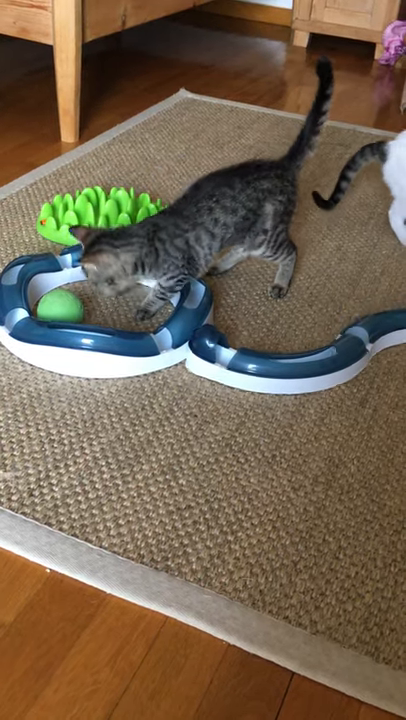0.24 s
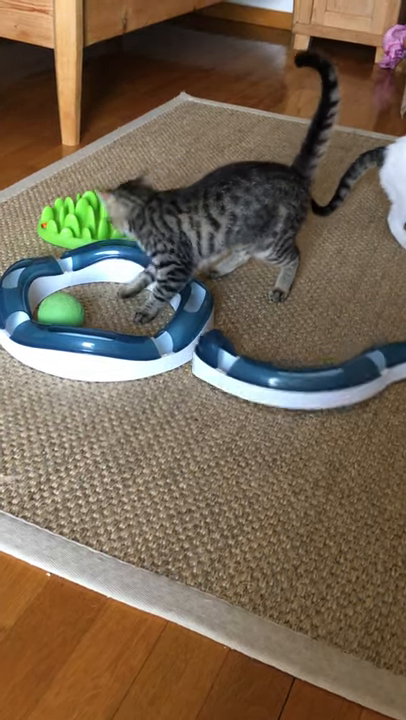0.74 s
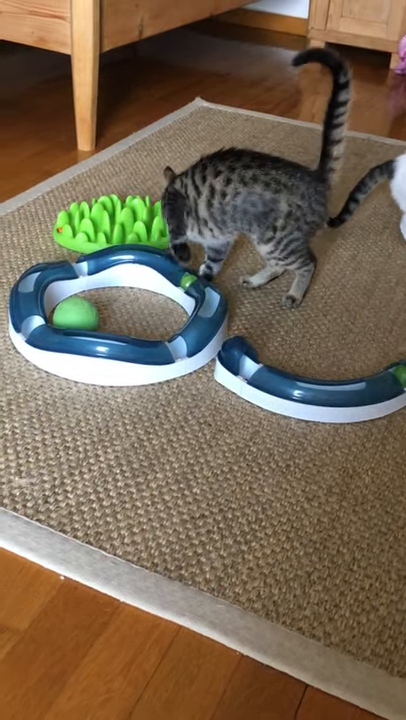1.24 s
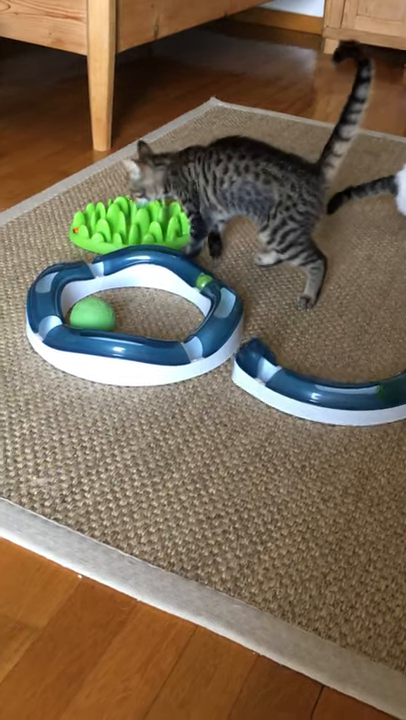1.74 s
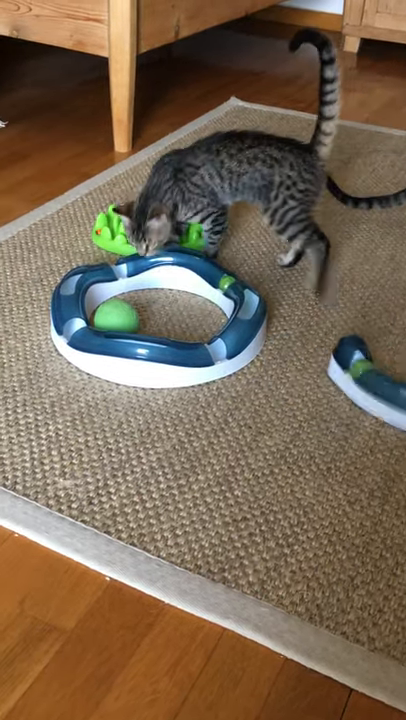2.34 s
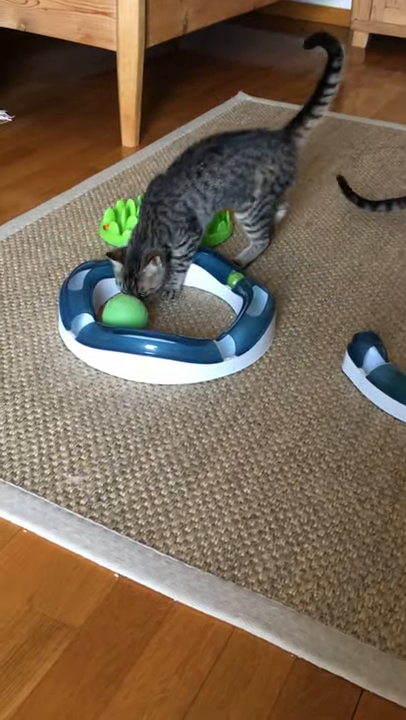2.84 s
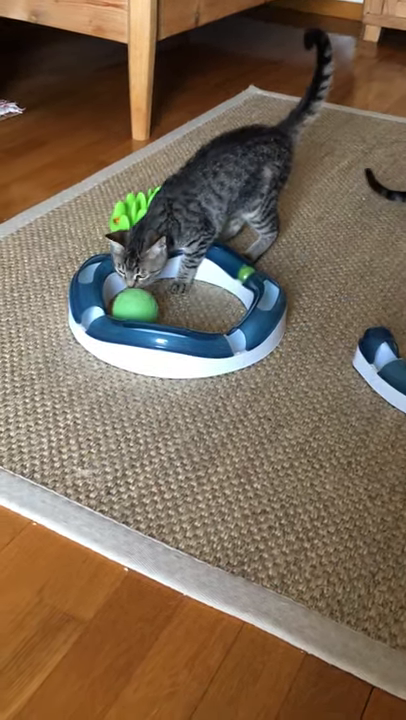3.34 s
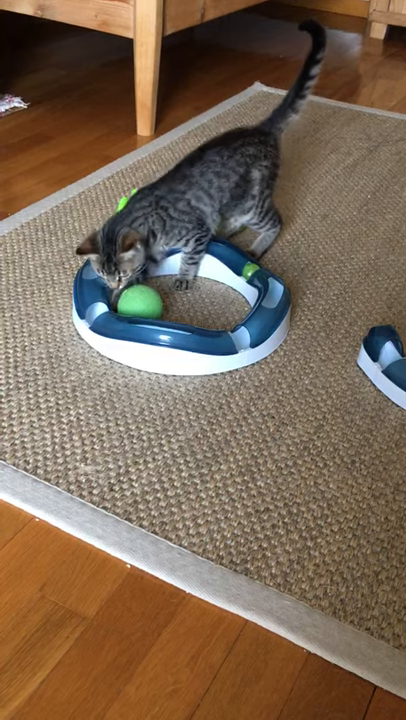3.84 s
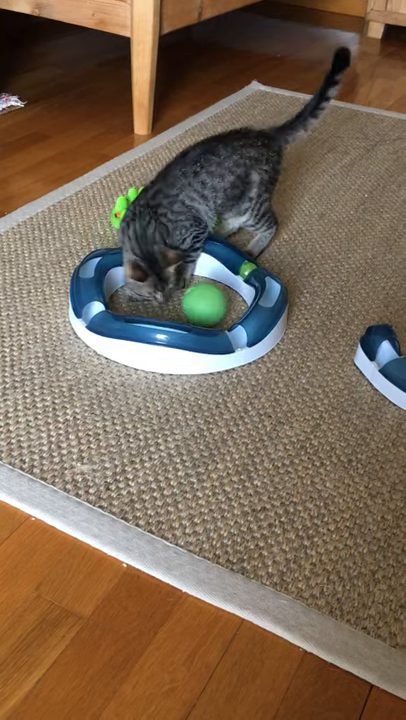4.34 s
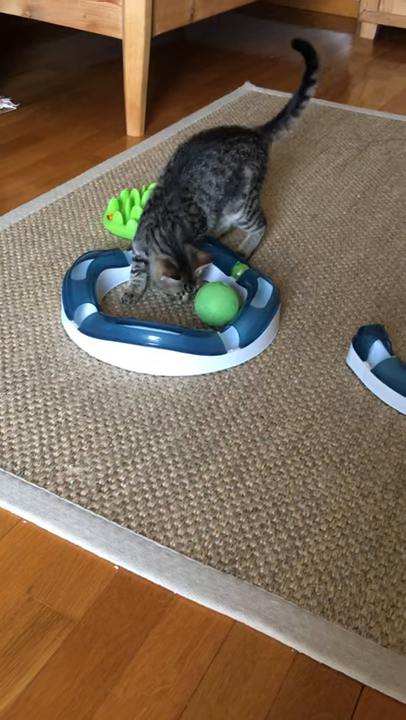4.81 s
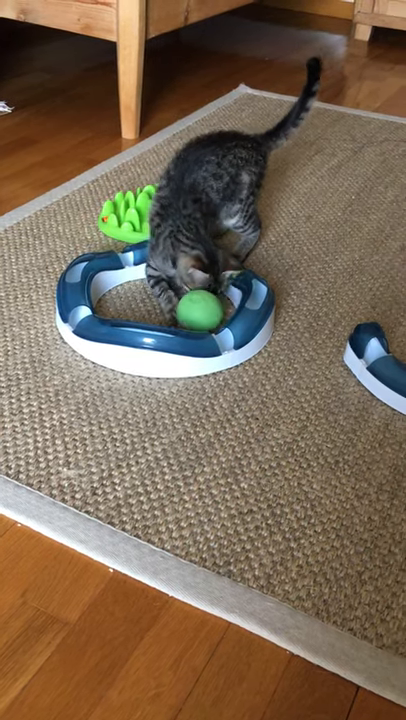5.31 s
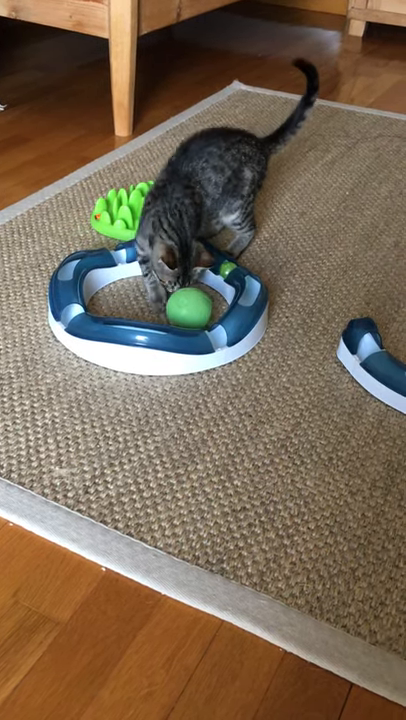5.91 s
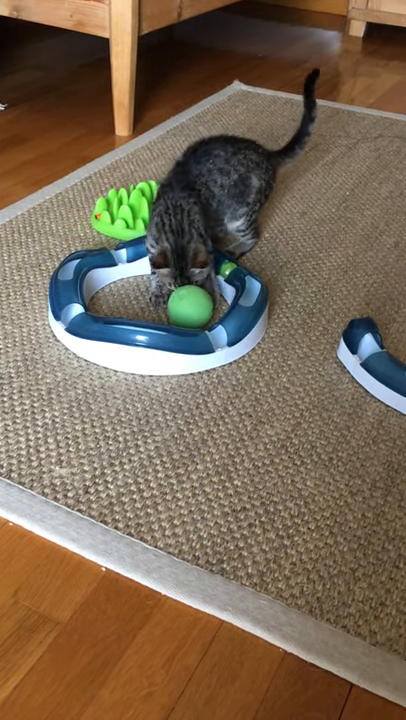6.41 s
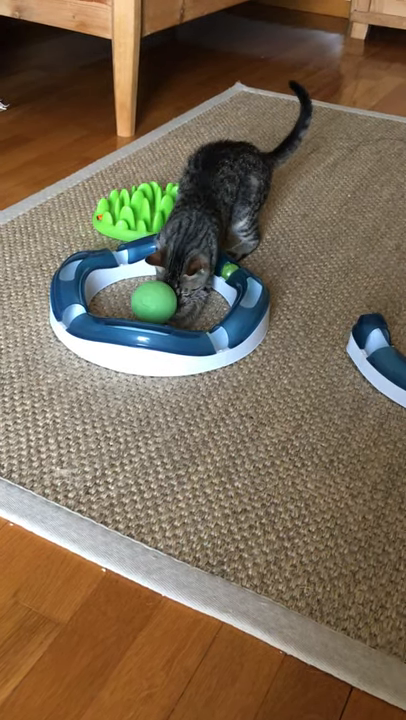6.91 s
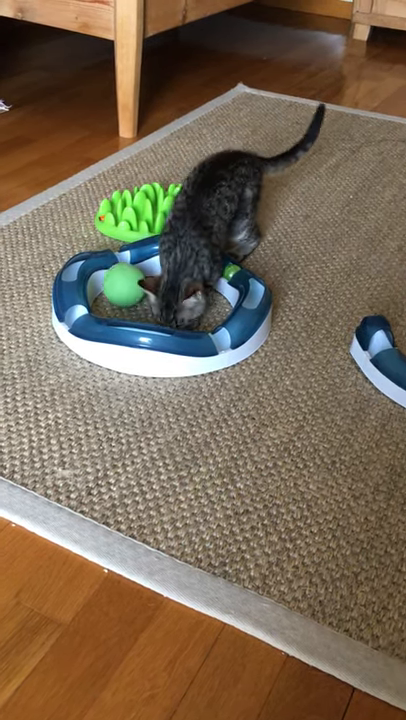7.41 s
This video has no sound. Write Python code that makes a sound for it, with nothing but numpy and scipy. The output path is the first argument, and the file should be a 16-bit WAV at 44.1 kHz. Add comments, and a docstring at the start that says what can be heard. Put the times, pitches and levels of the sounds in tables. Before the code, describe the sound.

Hollow plastic clatter and dry scraping on a rug in a bare room, peaking in a sharp double knock, then quietening into light ticks and rolling.

```python
"""A bare room with a wooden floor, where kittens bat at plastic ball tracks on a woven rug, heard on a phone.
Blows ring the hollow track shell as decaying modes, crack at the contact and thud into the floor, with low thumps.
Pieces dragged or rattling on hum and hiss as random ticks over the weave; a hollow ball rings over its ribs.
The room answers with a tail of up to half a second, shaped from noise bands, over a quiet noise hum."""
import sys
import numpy as np
from scipy import signal
from scipy.fft import rfft, irfft, next_fast_len
from scipy.io import wavfile
from scipy.ndimage import uniform_filter1d

SR = 44100
rng = np.random.default_rng(int(sys.argv[2]) if len(sys.argv) > 2 else 0)


def voltage_ratio(decibels):
    """Convert decibels (scalar or array-like) to amplitude ratios, 20 dB per decade."""
    exponent = np.asarray(decibels, float) / 20
    return 10 ** exponent


def log_audio(samples):
    """Write samples as a 16-bit WAV file to the path given in sys.argv[1]."""
    # one column per channel
    frames = np.atleast_2d(samples).T
    # limit to full scale, then quantise
    limited = np.clip(frames, -1, 1)
    pcm = np.round(limited * 32767).astype(np.int16)
    wavfile.write(sys.argv[1], SR, pcm)


N = 337785
T = np.arange(N) / SR

# blows on the track, thud and crack relative to the shell:
# (time [s], shell peak [dB], ringing centre [Hz], floor thud [dB], contact crack [dB])
KNOCKS = [(0.039, -37, 1570, -12.5, 0.5), (0.116, -31.5, 1670, -23.5, -1), (0.166, -40, 1580, -10.5, -19),
          (0.271, -41.5, 1370, -9.5, -22), (0.361, -37, 1720, -12.5, -6), (0.481, -39.5, 1310, -13, -2),
          (0.89, -13.5, 1120, -19, -8), (1.283, -43, 1780, -32, -0.5), (1.568, -46, 1430, -9, -1.5),
          (1.622, -26, 1060, -18, -16), (1.649, -21, 1300, -15, -11.5), (1.667, -39, 969, -6, -1),
          (1.696, -31.5, 3100, -10, 13), (1.71, -24, 1040, -37, -22), (1.745, -35, 1030, -13, 9),
          (1.795, -41, 1500, -10, 5), (1.834, -28.5, 1830, -25.5, 1), (1.889, -49, 1890, -15, -2),
          (1.944, -39.5, 1560, -12, -2), (2.001, -42, 1380, -14, 1), (2.102, -33, 1410, -12, 8),
          (2.17, -33.5, 1102, -24.5, 5.5), (2.192, -32.5, 1220, -38, -14), (2.301, -34.5, 1150, -4, -16),
          (2.43, -27, 1050, -9, -23), (2.442, -6.5, 1280, -12.5, -18), (2.45, -8.5, 1500, -16, 3.5),
          (2.457, -13.5, 1880, -12, -28), (2.588, -27.5, 1600, -12, 0), (2.747, -30.5, 1590, -18.5, -11),
          (3.129, -49.5, 1170, -20, -24.5), (3.317, -49.5, 1237, -10, -15.5), (3.617, -57, 2107, -13, -4),
          (3.651, -47, 1635, -11.5, -9.5), (3.99, -52, 1130, -14, -0.5), (4.511, -60.5, 1279, -12.5, -15.5),
          (4.584, -51, 1310, 2, -1), (4.778, -59.5, 1276, -6.5, -6), (4.908, -54, 1400, -16, -6),
          (5.033, -29.5, 2510, -37, 8.5), (5.202, -51.5, 1480, -2.5, 8.5), (5.451, -46, 2400, -27, 7),
          (5.463, -31.5, 2680, -26, 9.5), (5.488, -44.5, 1500, -14, 7), (5.527, -41.5, 2820, -16, 4),
          (5.556, -36.5, 1650, -36, 1), (5.607, -32, 3280, -19, 12.5), (5.629, -30, 1330, -12, 4),
          (5.698, -36, 1090, -7, -16), (5.761, -32.5, 1370, -27, 1), (5.77, -39, 1500, -19, 11),
          (5.788, -28.5, 1420, -8.5, -28), (5.81, -35, 1420, -10, -28), (6.068, -27.5, 1400, -13, 7.5),
          (6.08, -29, 1500, -11, -29), (6.209, -32.5, 1560, -8.5, -6), (6.288, -22.5, 1530, -25, -1),
          (6.304, -48, 1640, -10, -7), (6.349, -39, 1980, -14, 18.5), (6.467, -39.5, 1580, -13, 3),
          (6.634, -38, 1730, -5, 14), (6.759, -37, 2710, -17, -8), (6.776, -26.5, 1360, -20, 3),
          (6.834, -42.5, 1450, 4.5, -5.5), (7.054, -34, 1390, -3.5, -24), (7.125, -34, 1030, -6, -5.5),
          (7.272, -36, 1560, -41, 4), (7.306, -45, 1430, -3.5, 1), (7.353, -38.5, 1490, -15, 1),
          (7.388, -47, 1990, -27, 1), (7.613, -41.5, 1370, -6, -1)]
# low floor thumps: paws landing, track pieces settling, and the deep boom under the hardest blow:
# (time [s], peak [dB], centre [Hz])
FLOOR_THUMPS = [(0.63, -46, 198), (0.702, -51.5, 102), (1.661, -35, 325), (1.724, -43.5, 220),
                (2.301, -37, 339), (2.444, -24, 320), (2.452, -28, 135), (2.508, -29.5, 315),
                (3.869, -58, 364), (5.198, -49.5, 407), (5.294, -48, 61.9), (5.972, -40, 260),
                (6.013, -50, 280), (6.128, -47, 191), (6.858, -56, 415), (7.618, -42.5, 198)]
# modes of the hollow track shell: (frequency [Hz], relative level [dB], t60 [s])
SHELL_MODES = [(1003, 4, 0.0072), (1191, 7, 0.014), (1310, 1.5, 0.022), (1500, 5.5, 0.017),
               (1670, 5.5, 0.015), (1927, 3.5, 0.018), (2212, 0.5, 0.015), (2479, 3.5, 0.012),
               (2773, -7.5, 0.022), (2899, -14.5, 0.04), (3633, -12.5, 0.019), (4364, -15.5, 0.012),
               (5250, -10, .015), (5666, -1, 0.019)]
# modes of floor and rug under the toy: (frequency [Hz], relative level [dB], t60 [s])
BOARD_MODES = [(82, -21, .12), (116, -8, 0.16), (187, -2, .08), (245.4, 7.5, 0.03), (345, -1, 0.057),
               (468.4, 2.5, 0.023), (586, -2, 0.045), (712, 7, 0.02)]
# treble colour of the sharpest contact crack: (frequency [Hz], relative level [dB])
CRACK_COLOUR = [(1180, -38), (2000, -12), (2670, -7.5), (3280, -8), (6420, -14), (9580, -17.5),
                (10300, -17.5), (16000, -33)]
# pieces and paws dragged over the weave, or rattling on after a knock, one row a stroke:
# (start [s], length [s], shell rumble gain [dB], rumble centre [Hz], fibre hiss gain [dB])
RUB_STROKES = [(-0.04, 0.4, -55, 1540, -79), (0.39, 0.21, -58.5, 1450, -68),
               (0.615, 0.38, -53.5, 1430, -79), (0.844, 0.2, -49.5, 1220, -77),
               (1.72, 0.077, -47, 1270, -75), (1.824, 0.33, -52, 1589, -82), (2.118, 0.2, -47.5, 1260, -88),
               (2.359, 0.082, -51, 1220, -58), (2.604, 0.14, -53.5, 1500, -76),
               (2.719, 0.12, -71, 1585, -63.5), (2.891, 0.23, -70.5, 1330, -94.5),
               (3.413, 0.14, -70, 1280, -96), (5.104, 0.14, -57, 1970, -75), (5.24, 0.29, -61, 1000, -99),
               (5.563, 0.15, -48, 1880, -81), (5.741, 0.08, -55.5, 1510, -77),
               (6.154, 0.44, -59, 1540, -71), (6.467, 0.15, -36.5, 2900, -68),
               (6.589, 0.24, -44.5, 2630, -54), (6.8, 0.21, -53.5, 1570, -90),
               (6.953, 0.64, -65.5, 1430, -103)]
# faint shuffling between strokes: (rumble gain [dB], rumble centre [Hz], hiss gain [dB])
SHUFFLE = (-71, 1000, -84)
# colour of the loose fibres' hiss: (frequency [Hz], relative level [dB])
FIBRE_COLOUR = [(1760, -17.5), (3000, -7), (3170, -18.5), (3550, -21), (4470, -16.5), (8950, -17),
                (16000, -28.5)]
# hollow ball rolling over the weave, one row a roll: (start [s], length [s], gain [dB], centre [Hz])
ROLLS = [(-0.03, 0.088, -65, 450), (0.26, 0.12, -77, 350), (0.45, 0.22, -70, 328), (0.83, 0.078, -62, 350),
         (2.08, 0.13, -54, 600), (2.25, 0.19, -56, 345), (3.81, 0.055, -65, 468), (4.16, 0.14, -61, 530),
         (4.28, 0.18, -54, 510), (4.57, 0.21, -52.5, 460), (5.3, 0.19, -54, 740), (5.46, 0.11, -63, 550),
         (5.6, 0.2, -58, 400), (6.05, 0.042, -43, 530), (6.18, 0.18, -55, 500), (6.6, 0.5, -60, 470),
         (7.05, 0.035, -49.5, 470), (7.12, 0.079, -62, 470), (7.3, 0.19, -65, 450),
         (7.5, 0.034, -57.5, 530), (7.56, 0.1, -56, 500)]
# resonances of the ball, each passed twice: (frequency [Hz], width of one pass [Hz], relative level [dB])
BALL_MODES = [(286, 140, -7.5), (350, 46, 2), (404, 77, 4.5), (504, 94, 1), (550.4, 78, 5), (654, 12, -6.5),
              (714, 130, -10), (950, 76, -21)]
# colour of the house hum: (frequency [Hz], relative level [dB])
HUM_COLOUR = [(18, -37), (30, -2), (64, 5), (98, 5.5), (204, -5.5), (336, -3.5), (437, -11), (666, -9.5),
              (937, -13), (1500, -22), (3400, -31), (12300, -33), (16000, -45.5)]
# bands of the room tail: (centre [Hz], t60 [s], relative level [dB])
ROOM_BANDS = [(91, 0.23, 1), (173, 0.32, -2.5), (365, .5, 2), (726, 0.4, 4.5), (1400, 0.44, -1),
              (2900, 0.41, 0.5), (5360, 0.37, -4), (11100, 0.2, -0.5)]
# treble dips of the phone's port: (centre [Hz], width [Hz], depth [0-1])
PORT_DIPS = [(7610, 380, 0.4), (10300, 370, 0.9)]

HUM_DB = -63  # rms
ROOM_DB, ROOM_ONSET_S = -4.5, 0.0066
BASS_HZ, TOP_HZ = 46.5, 16300
SPAN, LEAD = 3072, 64  # samples held by one blow, and kept ahead of its onset
SCATTER_DB = 1.5  # standard deviation of a mode's level from blow to blow
SHARP_DB = 12  # a crack this strong against the shell keeps all its treble
# small chance taps: count, greatest peak at rest [dB], spread below it [dB], middle of the ringing centres [Hz]
TAPS, TAP_DB, TAP_SPREAD_DB, TAP_HZ = 36, -58, 8, 1400
TAP_THUD_DB, TAP_CRACK_DB = -18, -10  # against the shell
TAP_FOLLOW = 0.8  # dB of tap per dB of rumble
RUB_ATTACK_S, RUB_RELEASE_S = 0.028, 0.02
ROLL_ATTACK_S, ROLL_RELEASE_S = 0.047, 0.033


def level(x, db):
    """Scale to an rms level."""
    return x * voltage_ratio(db) / np.sqrt(np.mean(x ** 2))


def colour(x, points):
    """Shape a spectrum by (Hz, dB) points, without moving the phase."""
    hz, db = np.transpose(points)
    size = next_fast_len(len(x))
    f = np.maximum(np.fft.rfftfreq(size, 1 / SR), 1)
    gain = voltage_ratio(np.interp(np.log(f), np.log(hz), db))
    return irfft(rfft(x, size) * gain, size)[:len(x)]


def house_hum():
    """Steady noise, coloured into the quiet hum of the house."""
    return level(colour(rng.standard_normal(N), HUM_COLOUR), HUM_DB)


def resonate(x, hz, width_hz):
    """One resonance, gain 1 at its centre."""
    return signal.lfilter(*signal.iirpeak(hz, hz / width_hz, SR), x)


def grains(per_s, spread_db):
    """Random tiny contacts of either sign; a few are bigger than the rest."""
    size_db = spread_db * np.minimum(rng.exponential(size=N), 3)
    size = voltage_ratio(size_db) * np.sign(rng.standard_normal(N))
    return size * (rng.random(N) < per_s / SR)


def strokes(rows, attack_s, release_s):
    """Each (start, length, dB, Hz) row swells, holds and fades; gives summed gain and gain-weighted pitch."""
    gain, pitch = 1e-9, 1e-6  # keep the ratio finite in silence
    for s, length, db, hz in rows:
        swell = np.clip((T - s) / attack_s, 0, 1)
        fade = np.exp(-np.maximum(T - s - length, 0) / release_s)
        g = voltage_ratio(db) * swell * fade
        gain, pitch = gain + g, pitch + g * hz
    return gain, pitch / gain


def rub():
    """Dragged or rattling contacts tick on the shell, which hums around each stroke's pitch; fibres hiss."""
    rows = [(-1, N / SR + 1, *SHUFFLE), *RUB_STROKES]
    s, length, rumble_db, hz, hiss_db = np.transpose(rows)
    rumble, centre_hz = strokes(zip(s, length, rumble_db, hz), RUB_ATTACK_S, RUB_RELEASE_S)
    hiss, _ = strokes(zip(s, length, hiss_db, hz), RUB_ATTACK_S, RUB_RELEASE_S)
    ticks = grains(1800, 1.4)
    shell = 0
    for hz, db, t60 in SHELL_MODES:
        focus = voltage_ratio(db - 15 * np.log2(hz / centre_hz) ** 2)
        shell = shell + focus * level(resonate(ticks, hz, 3.36 / t60), -20.5)
    fibres = colour(0.97 * ticks + grains(3300, 4.7), FIBRE_COLOUR)
    return rumble * shell + hiss * level(fibres, -6), rumble


def ball():
    """Soft bumps over the ribs of the weave ring the air inside the ball; it rests between rolls."""
    roll, centre_hz = strokes(ROLLS, ROLL_ATTACK_S, ROLL_RELEASE_S)
    wander = level(uniform_filter1d(rng.standard_normal(N), size=4000), 0)
    ribs_hz = 48 * (1.5 + 0.12 * wander)  # about 72 ribs a second
    ribs = np.cos(np.cumsum(2 * np.pi * ribs_hz / SR))
    bumps = grains(540, 7.8) * voltage_ratio(4.6 * ribs)
    air = 0
    for hz, width_hz, db in BALL_MODES:
        focus = voltage_ratio(db - 6.6 * np.log2(hz / centre_hz) ** 2)
        ringing = resonate(resonate(bumps, hz, width_hz), hz, width_hz)
        air = air + focus * level(ringing, -9)
    return roll * air


def room(x):
    """Dense reflections that build up over a few ms and die away, each band at its own pace."""
    t = np.arange(SR) / SR
    tail = 0
    for hz, t60, db in ROOM_BANDS:
        edges = [hz / np.sqrt(2), hz * np.sqrt(2)]
        octave = signal.butter(2, edges, "bandpass", fs=SR, output="sos")
        band = signal.sosfilt(octave, rng.standard_normal(SR))
        tail = tail + voltage_ratio(db) * band * np.exp(-np.log(1000) * t / t60) / np.sqrt(t60)
    tail = tail * (1 - np.exp(-(t / ROOM_ONSET_S) ** 2))
    tail = tail / np.sqrt(np.sum(tail ** 2))
    return voltage_ratio(ROOM_DB) * signal.fftconvolve(x, tail)[:N]


def near(modes, hz, focus_db):
    """A blow wakes the modes near its own pitch most; higher ones fall off more gently than lower ones."""
    octaves = np.log2(np.array(modes)[:, 0] / hz)
    return -focus_db * octaves ** 2 * np.where(octaves > 0, 0.6, 1)


def ring(modes, gain_db, chance, push_s):
    """Decaying modes, slightly detuned, that swell while the push lasts; peak 1."""
    hz, db, t60 = (c[:, None] for c in np.transpose(modes))
    t = T[:SPAN]
    detune, scatter, side = chance[:, :len(modes), None]
    size = voltage_ratio(db + gain_db[:, None] + SCATTER_DB * scatter) * np.sign(side)
    tones = size * np.sin(2 * np.pi * hz * (1 + 0.025 * detune) * t)
    y = (tones * np.exp(-np.log(1000) * t / t60)).sum(axis=0)
    y = y * (1 - np.exp(-(t / push_s) ** 2))
    return y / np.abs(y).max()


def contact_crack(crack_db, noise):
    """Hard plastic edges meet in one tick and chatter for a moment; a weaker crack is blunter. Peak 1."""
    tick = 0.12 * noise * np.exp(-T[:SPAN] / 0.002)
    tick[0] += 1
    dull_db = 0.24 * min(crack_db - SHARP_DB, 0)  # tilt per octave about 3 kHz
    points = [(f, d + dull_db * np.log2(f / 3000)) for f, d in CRACK_COLOUR]
    crack = colour(np.roll(tick, LEAD), points)
    return crack / np.abs(crack).max()


def knocks(blows):
    """Each blow lands on another spot, so it wakes its own mix of shell and floor modes."""
    out = np.zeros(N + SPAN)
    for s, db, hz, thud_db, crack_db in blows:
        chance = rng.standard_normal((7, SPAN))
        shell = ring(SHELL_MODES, near(SHELL_MODES, hz, 8.3), chance[:3], 0.0008)
        thud_hz = 330 * voltage_ratio(-0.2 * (db + 40))  # harder blows reach deeper modes
        thud = ring(BOARD_MODES, near(BOARD_MODES, thud_hz, 0.42), chance[3:6], 0.0017)
        body = np.roll(shell + voltage_ratio(thud_db) * thud, LEAD)
        crack = voltage_ratio(crack_db) * contact_crack(crack_db, chance[6])
        i = int(s * SR) - LEAD
        out[i:i + SPAN] += voltage_ratio(db) * (body + crack)
    return out[:N]


def taps(rumble):
    """Rows of blows: loose pieces tick at chance moments, harder while the rumble is stronger."""
    when, size, spot = rng.random((TAPS, 3)).T
    s = 0.02 + (np.arange(TAPS) + when) * (N / SR - 0.04) / TAPS  # one in each equal slot
    rumble_db = 20 * np.log10(rumble[(s * SR).astype(int)])
    db = TAP_FOLLOW * (rumble_db - SHUFFLE[0]) + TAP_DB - TAP_SPREAD_DB * size
    hz = TAP_HZ * (1 + 0.3 * (spot - 0.5))
    return [(a, b, c, TAP_THUD_DB, TAP_CRACK_DB) for a, b, c in zip(s, db, hz)]


def floor_thumps():
    """Paws, settling pieces and the hardest blow's boom push the boards slowly; modes near each centre answer."""
    out = np.zeros(N + SPAN)
    for s, db, hz in FLOOR_THUMPS:
        i = int(s * SR)
        chance = rng.standard_normal((3, 16))
        out[i:i + SPAN] += voltage_ratio(db) * ring(BOARD_MODES, near(BOARD_MODES, hz, 44), chance, 0.0016)
    return out[:N]


def scene():
    """Blows, floor thumps, rubbing and rolling, their echo in the room, and the hum of the house."""
    scrape, rumble = rub()
    rubbing = scrape + ball()
    thumps = floor_thumps()
    blows = knocks(KNOCKS + taps(rumble))
    echo = room(voltage_ratio(3.5) * blows + voltage_ratio(-1) * thumps + voltage_ratio(-10) * rubbing)
    return (blows + thumps + rubbing + echo + house_hum())[None]


def low_pass(x):
    """Removes everything above the highest recorded frequency."""
    return signal.sosfilt(signal.butter(12, 16720, fs=SR, output="sos"), x)


def record(dry):
    """The phone's port dips twice in the treble; its bass and extreme top are cut."""
    for hz, width_hz, depth in PORT_DIPS:
        dry = dry - depth * resonate(dry, hz, width_hz)
    bass_cut = signal.butter(2, BASS_HZ, "highpass", fs=SR, output="sos")
    top_cut = signal.ellip(8, 0.2, 70, TOP_HZ, fs=SR, output="sos")
    mix = signal.sosfilt(top_cut, signal.sosfilt(bass_cut, dry))
    return low_pass(mix)


dry = scene()
out = record(dry)
log_audio(out)
```